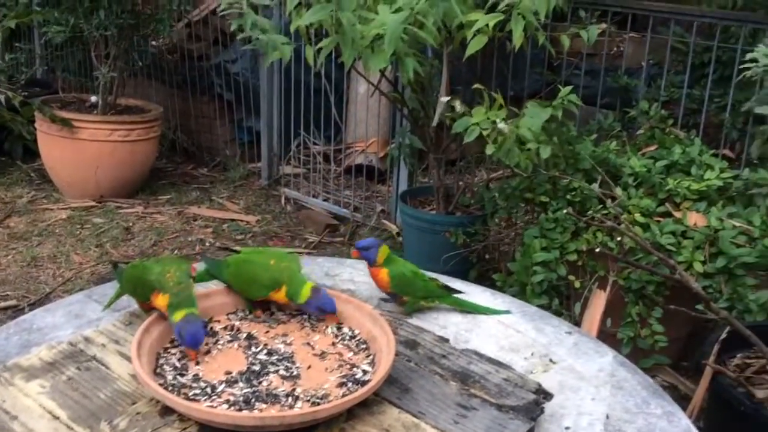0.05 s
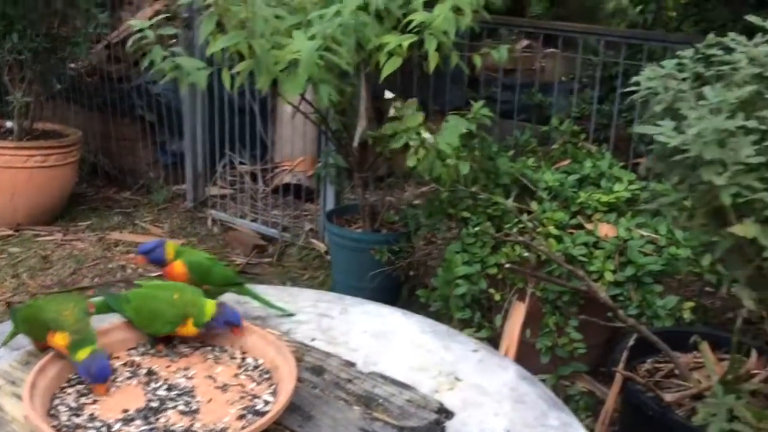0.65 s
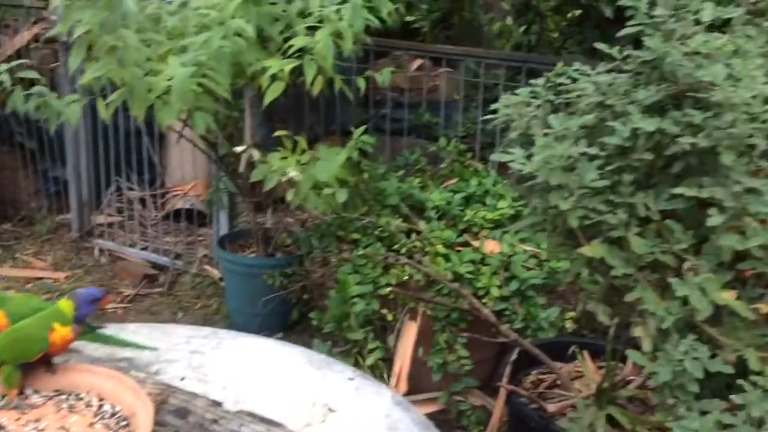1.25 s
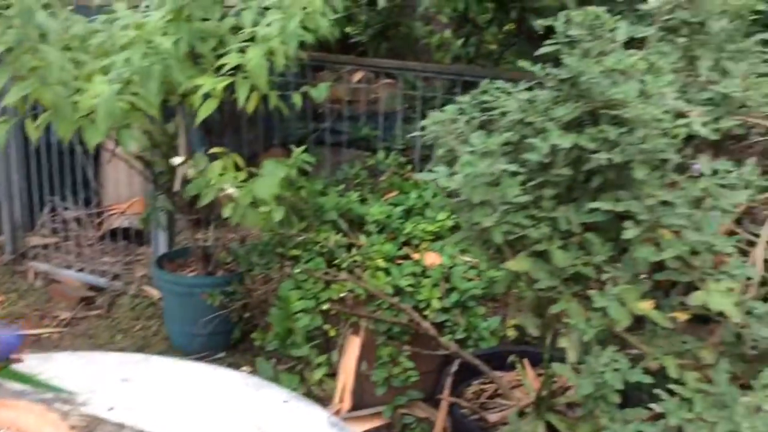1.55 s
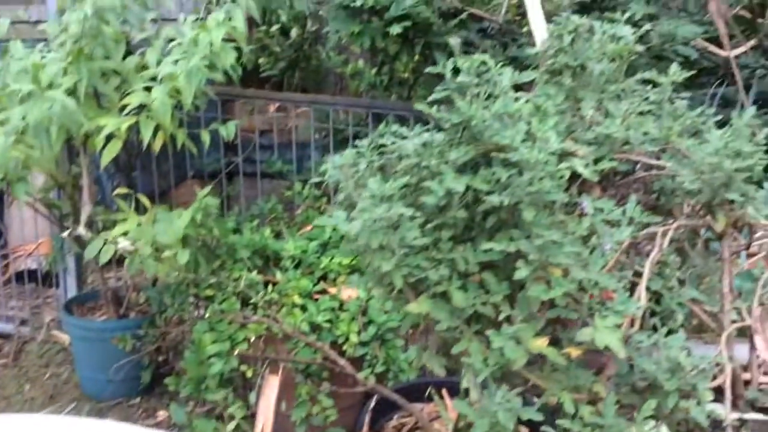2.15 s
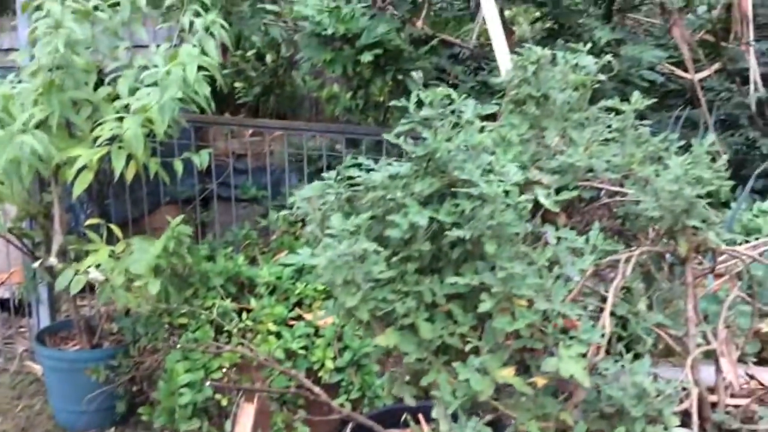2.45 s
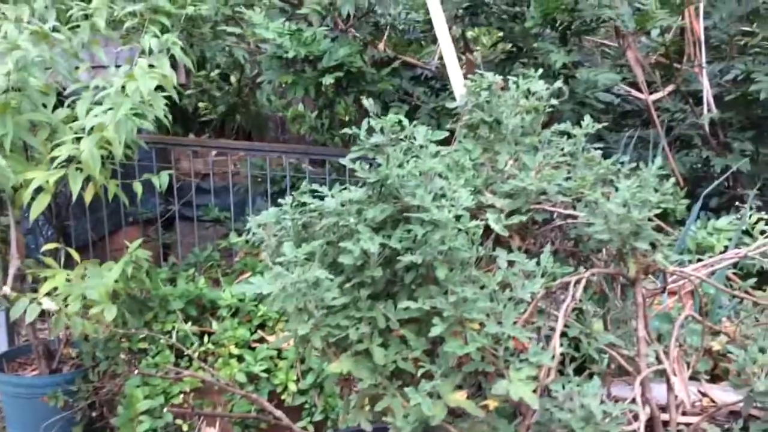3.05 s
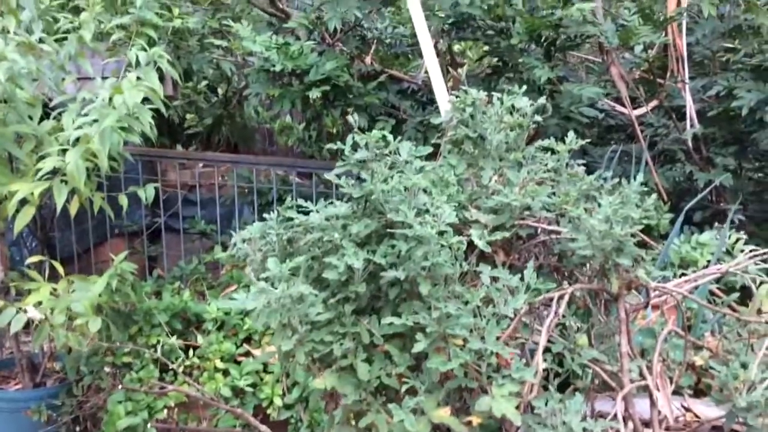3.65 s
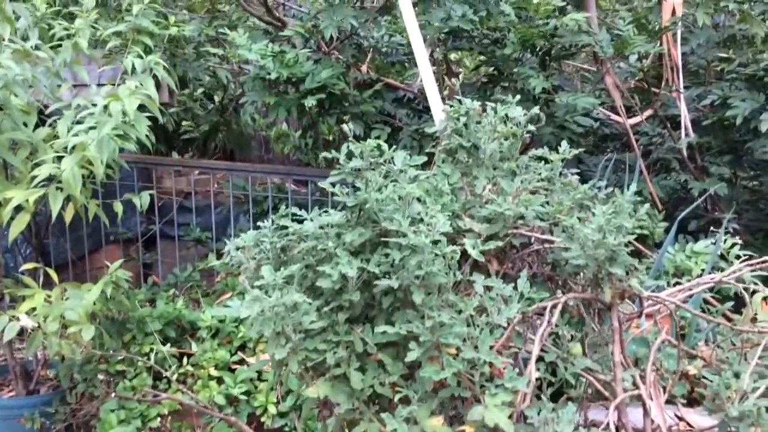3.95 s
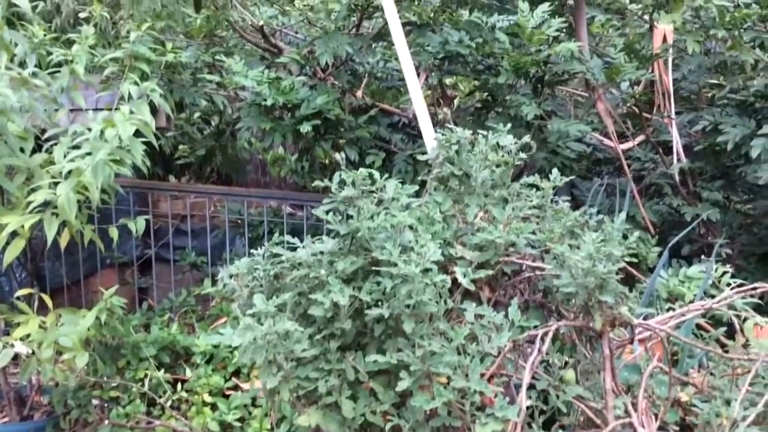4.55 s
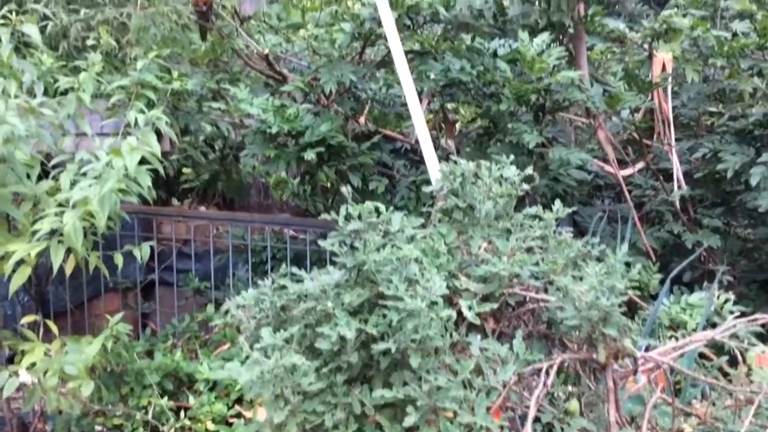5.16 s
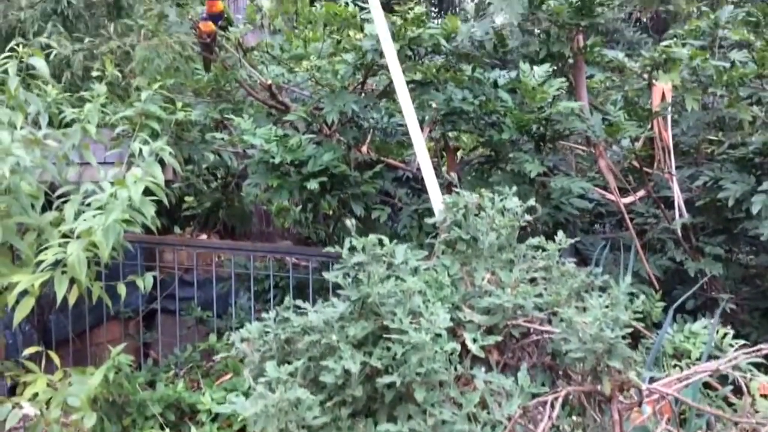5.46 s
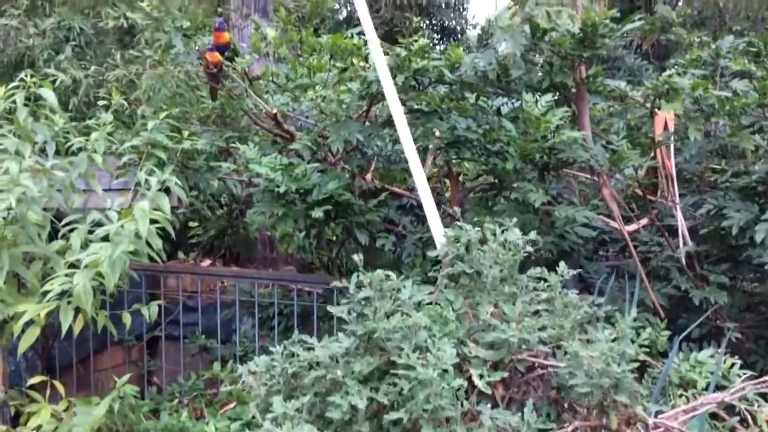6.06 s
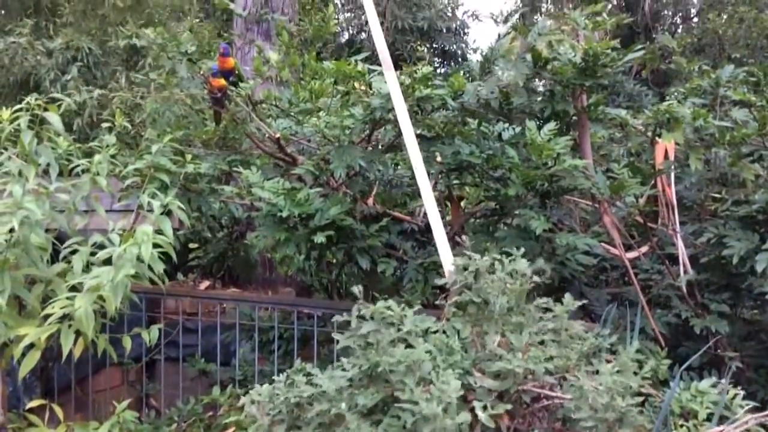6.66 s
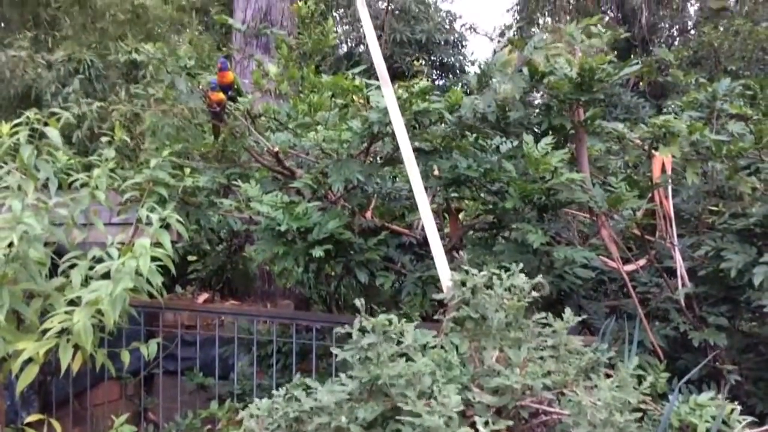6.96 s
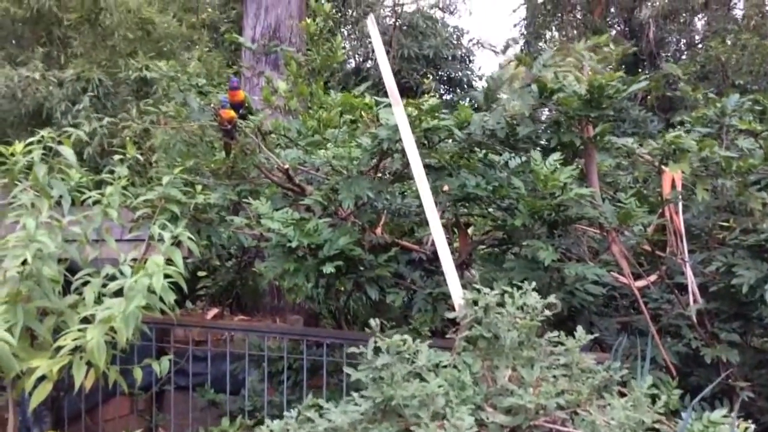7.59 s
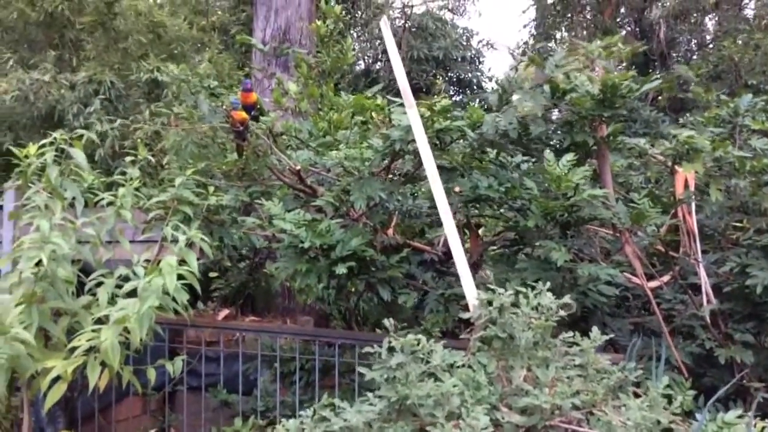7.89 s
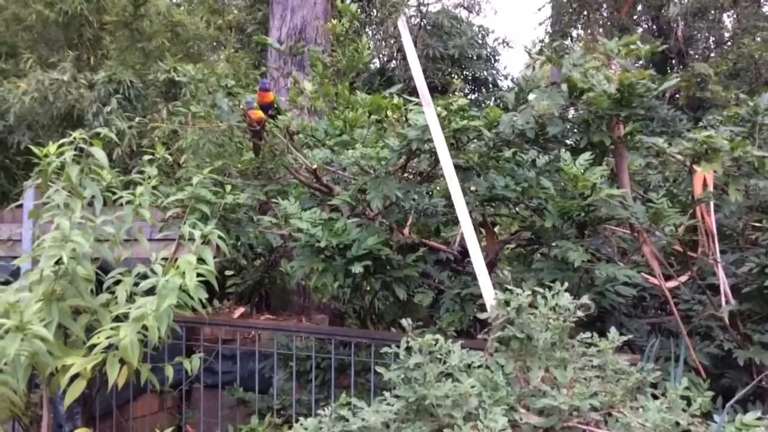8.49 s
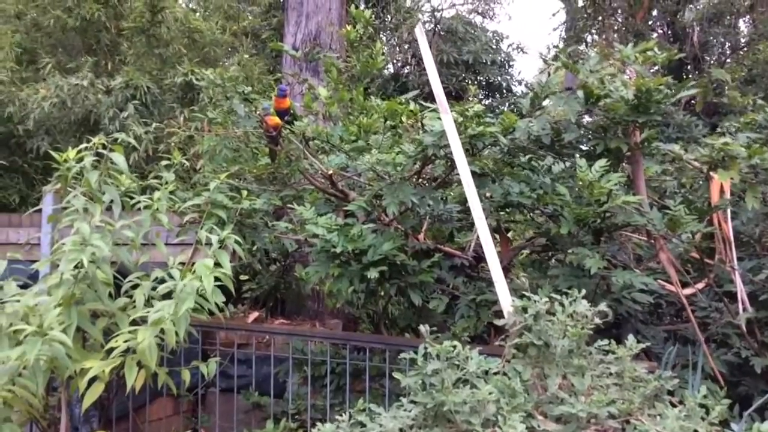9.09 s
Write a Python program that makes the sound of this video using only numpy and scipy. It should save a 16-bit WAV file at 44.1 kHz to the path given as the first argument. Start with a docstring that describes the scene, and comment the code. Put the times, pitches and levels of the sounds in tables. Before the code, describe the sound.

Parrots call around a garden feeder. The flock in the trees trades short, high, gliding chirps in quick clusters, now and then breaking into brief rasping screeches, while one close bird twitters in lower, scratchy syllables. Early on, a few seed husks click and the hand-held microphone takes soft dull bumps. The calls echo lightly off fence and foliage, over steady leaf hiss and a faint engine drone.

```python
"""Garden feeder with lorikeets. One close bird twitters in quick low syllables; the flock in the trees
trades shrill gliding calls that break into rasping screeches. Each note is a harmonic glide of the
syrinx, shaped by throat and beak; blown hard, the syrinx pulses chaotically. Fence and foliage echo.
Distant engines drone, leaves hiss, seed husks click, the hand-held microphone takes a few dull bumps."""
import sys
import numpy as np
from scipy import signal
from scipy.fft import rfft, irfft, next_fast_len
from scipy.io import wavfile
from scipy.ndimage import map_coordinates

SR = 44100
rng = np.random.default_rng(int(sys.argv[2]) if len(sys.argv) > 2 else 0)


def transcribe(signal):
    """Save signal, clipped to [-1, 1], as a 16-bit WAV file at the path in sys.argv[1]."""
    frames = np.atleast_2d(signal).T
    limited = np.clip(frames, -1, 1)
    pcm = np.round(limited * 32767).astype(np.int16)
    wavfile.write(sys.argv[1], SR, pcm)


N = 411453

AIR_SPECTRUM = [(15, -63), (25, -30), (48, -4.5), (69, -1), (107, -9.5), (198, -10.5), (349, -11.5),
                (378, -15), (410, -12), (722, -12.5), (2060, -19.5), (2230, -22.5), (2420, -19),
                (9050, -21.5), (15500, -40)]  # air and leaves: f/Hz, relative density/dB
ENGINE_DRONE = [(0, 78.1, -67), (.8, 80, -71), (1.8, 85, -67), (2.9, 86.7, -86), (3.5, 88, -63),
                (4.4, 86, -65), (5, 84, -61.5), (5.8, 82, -58), (6.3, 82, -66.5), (6.7, 81.7, -61),
                (7.1, 78, -97), (8.6, 67, -68), (9.33, 64.7, -75)]  # distant engine: t/s, firing f/Hz, level/dB
ENGINE_REV = [(7.3, 128, -100), (7.5, 131.7, -70), (7.7, 140, -65.5), (7.88, 145, -65), (8.05, 144, -100)]  # second engine, brief rev: t/s, firing f/Hz, level/dB
MIC_BUMPS = [(.85, -46, 75), (.93, -50, 80), (1.19, -53, 55), (2.14, -46, 62), (2.176, -50, 80),
             (2.268, -51, 64.4), (2.436, -46, 60.4), (2.454, -45, 140), (2.567, -42.5, 67.4)]  # dull knocks: t/s, level/dB, f/Hz
HUSK_CRACKS = [(0.907, -43), (1.76, -34), (2.392, -39), (2.73, -34), (2.757, -33.5)]  # seeds opened: t/s, excitation level/dB
FOLIAGE_DECAY = [(500, 0.62), (3000, 0.73), (6000, 0.71), (10000, 0.79), (15000, 0.41)]  # echo tail: f/Hz, T60/s
FOLIAGE_COLOUR = [(800, 4.5), (1800, -5), (3000, 0.5), (6000, 2), (10000, -1)]  # echo tail: f/Hz, gain/dB
BEAK_GAIN = [(500, -50), (1000, -8), (1500, -11.5), (2200, -2.5), (3000, -3.5), (3600, 3), (4300, -2),
             (5100, 1.5), (6400, -3.5), (7900, -2.5), (9500, -4), (11000, -11.5), (13000, -45),
             (15500, -53)]  # wide open beak: f/Hz, gain/dB
THROAT_TREBLE = [(7000, 1.5), (9500, 3), (11000, -4), (13000, -4.5), (15500, -20)]  # top harmonics leaving the throat: f/Hz, gain/dB
FLOCK_FORMANTS = [(1500, -0.5), (2200, 3.5), (2900, -1.5), (3700, 6), (4400, 0), (5200, 2.5), (6000, 1.5),
                  (6700, -4.5), (8000, -10), (9600, -13), (11400, -21), (13000, -34)]  # flock's throat resonances: f/Hz, gain/dB
CLOSE_FORMANTS = [(900, 2), (1900, 1.5), (2850, 0.5), (3700, -8.5), (4600, 3), (5400, -9), (7200, -16.5),
                  (9500, -26.5)]  # close bird's throat resonances: f/Hz, gain/dB
# flock glides: t/s, length/s, start f/Hz, end f/Hz, relative level/dB, brightness/dB
FLOCK_CALLS = [(0, 0.029, 2445, 2750, -58, -5), (.211, 0.014, 2640, 2980, -60, -10),
               (0.35, 0.17, 2745, 3187, -58, 3.5), (.795, 0.0402, 4000, 3590, -55.5, -1),
               (0.838, 0.081, 2537, 3010, -58, 0.5), (1.154, 0.055, 2164, 2280, -54, -6),
               (1.211, 0.034, 2510, 2815, -44, 4.5), (1.251, .05, 2450, 2316, -47.5, 9),
               (1.257, 0.056, 3990, 4100, -44.5, 8), (1.307, 0.022, 3394, 3265, -40, 9),
               (1.555, 0.028, 4030, 3720, -39, 8), (1.58, 0.024, 2680, 2366, -40.5, -5),
               (1.772, 0.032, 3550, 2930, -47, -4), (1.805, 0.075, 3820, 3430, -51, 3),
               (1.836, 0.095, 2564, 2530, -49, 4), (1.938, 0.072, 3050, 2624, -45.5, -2),
               (1.945, 0.032, 2440, 2250, -44, -2), (2.031, 0.038, 3120, 3120, -48.5, 4),
               (2.076, 0.041, 2760, 2474, -47, -4), (2.117, 0.067, 3645, 3780, -49, 1),
               (2.171, 0.057, 3286, 2815, -42, -6.5), (2.519, 0.054, 2120, 2640, -55, 14),
               (2.582, 0.047, 4180, 3930, -52.5, 3), (2.631, 0.091, 2810, 3150, -49.5, 5),
               (2.917, 0.091, 3165, 3270, -61, -3), (3.068, 0.069, 2210, 2800, -55, -3),
               (3.149, 0.098, 2272, 2566, -51.5, -0.5), (3.327, .14, 2467, 2836, -57, 0.5),
               (3.396, 0.17, 3625, 4116, -57, -2), (3.709, 0.13, 2250, 2440, -56.5, 3.5),
               (3.798, 0.085, 2550, 2580, -49.5, 9), (3.931, .056, 2745, 2890, -55, -4.5),
               (4.01, 0.093, 3043, 2910, -51, -1), (4.084, 0.089, 3800, 4390, -47, 4.5),
               (4.138, 0.093, 3120, 3337, -45, 10.5), (4.245, .037, 3050, 2570, -53, -8),
               (4.323, 0.063, 3505, 3203, -47.5, 7), (4.328, 0.056, 2040, 2800, -49.5, 3.5),
               (4.481, 0.071, 2880, 2910, -54.5, -3), (4.575, 0.056, 2790, 4040, -54.5, 6),
               (4.741, 0.068, 1477, 1690, -52.5, -3), (4.788, 0.032, 4140, 3860, -53.5, 0),
               (4.859, 0.065, 1730, 2180, -51, 0), (4.977, .07, 3060, 2970, -50, 1),
               (5.25, 0.13, 2150, 2393, -56, 4.5), (5.338, .18, 2480, 2557, -53.5, 4),
               (5.359, .13, 2836, 3170, -52.5, 3.5), (5.68, 0.076, 2080, 2880, -54.5, -3),
               (5.752, .022, 2786, 3050, -37.5, -8.5), (5.768, 0.041, 3720, 3770, -34, 1),
               (5.798, 0.0279, 3540, 3916, -34.5, 0.5), (5.843, .036, 2660, 2630, -46, -12),
               (5.907, .059, 3625, 3440, -49, 1), (5.921, .11, 2798, 2650, -49.5, -3),
               (6.01, 0.081, 2865, 3060, -53.5, 0), (6.017, 0.052, 3990, 3930, -53, -6),
               (6.23, 0.094, 2277, 2520, -54.5, 1.5), (6.29, .029, 3990, 3880, -50.5, -3),
               (6.319, 0.047, 2880, 3110, -48.5, 3.5), (6.358, 0.036, 2230, 2185, -52, 4),
               (7.56, 0.057, 3210, 3474, -50, 5), (7.719, 0.17, 1560, 1748, -60, -4),
               (7.75, 0.13, 3175, 3440, -59.5, 4), (7.828, 0.12, 4190, 4800, -50, 0),
               (7.907, .062, 3765, 3200, -48.5, 9.5), (8.031, 0.068, 2766, 2790, -41.5, -8.5),
               (8.097, 0.13, 2853, 3122, -36.5, 9), (8.102, 0.071, 2577, 2627, -40, 6.5),
               (8.2, 0.058, 3120, 3227, -40.5, 5), (8.27, .12, 3950, 3354, -45.5, -5),
               (9.086, 0.16, 2033, 2870, -58.5, -8), (9.195, 0.15, 3585, 3860, -54, -9)]
# screeches: peak t/s, swell/s, fade/s, level/dB, pulse f/Hz, whistle f/Hz, whistle level/dB
SCREECH_BURSTS = [(1.593, 0.0082, .016, -39, 817, 3280, -47), (4.692, 0.032, 0.028, -34, 705, 1427, -43),
                  (4.952, 0.025, 0.034, -41.5, 726, 1423, -49),
                  (6.494, .031, 0.0157, -26.5, 900, 2480, -35),
                  (6.532, 0.0076, 0.015, -33.5, 1947, 1918, -41),
                  (6.963, 0.023, 0.019, -34, 1142, 3510, -51.5), (7.5, .019, 0.0157, -61, 957, 1753, -54),
                  (7.621, .024, 0.021, -35.5, 1161, 3450, -52), (8.33, 0.054, 0.082, -41.5, 920, 3590, -47)]
# close bird's runs: t/s, length/s, syllables, start f/Hz, end f/Hz, rasp/0-1, level/dB, brightness/dB
CLOSE_RUNS = [(0, 0.018, 1, 1603, 1476, 0.67, -49.5, -3.5), (1.447, 0.041, 1, 1790, 1970, 0.14, -48.5, -13),
              (1.496, 0.067, 1, 2260, 2580, 0.15, -43, -13), (1.908, 0.012, 1, 840, 940, 0.08, -43.5, 7),
              (1.914, 0.025, 1, 1905, 2200, 0.12, -29.5, 7.5), (1.964, 0.026, 1, 1727, 1950, .1, -44.5, -1),
              (2.0, .03, 2, 1890, 1824, 0.21, -39, 4.5), (2.047, .021, 1, 1690, 1650, .1, -49, 2),
              (2.759, 0.019, 1, 890, 840, .33, -59, -21), (4.587, 0.04, 1, 2100, 1740, 0.27, -47, 4),
              (4.621, 0.057, 1, 1233, 1400, 0.13, -42, 4.5), (6.411, .05, 1, 1852, 2257, 0.34, -39, 4.5),
              (6.567, 0.03, 1, 1744, 1980, .2, -42.5, -6), (6.597, .008, 1, 1800, 1480, .1, -44, -3),
              (6.612, .025, 1, 1754, 2055, 0.21, -35.5, 4.5), (6.642, 0.077, 4, 1740, 1787, 0.2, -42, -2.5),
              (7.369, 0.053, 1, 1940, 1544, .35, -55.5, -4), (7.418, 0.061, 1, 1866, 1686, 0.3, -51.5, -4),
              (7.473, 0.055, 1, 880, 970, 0.49, -46.5, -3.5), (8.281, .049, 1, 850, 938, 0.67, -50.5, 2),
              (8.836, 0.015, 1, 1815, 2000, 0.17, -45.5, -7.5),
              (8.867, 0.032, 1, 1040, 936, 0.3, -50, -1.5), (8.916, 0.037, 2, 1960, 1700, 0.25, -49, 0.5),
              (8.956, 0.073, 4, 1684, 1690, 0.24, -50.5, 6), (9.035, .045, 1, 986, 960, 0.26, -44, 1),
              (9.121, 0.032, 2, 1670, 1744, 0.32, -49, 3), (9.156, .075, 2, 1890, 1714, 0.27, -55, -2),
              (9.26, 0.063, 2, 1506, 1634, 0.3, -55, -5)]
# its clean two-note seesaw: first t/s, note length/s, f/Hz, level/dB, brightness/dB
CLOSE_SEESAW = [(6.719, 0.0227, 1700, -49.5, 4), (6.755, 0.016, 2010, -50.5, 0)]

TOP_HZ = 15400
CALL_EDGE_S = .006  # half of a call's fade-in or fade-out


def amp(db):
    """Decibels to gain."""
    return 10 ** (np.asarray(db) / 20)


def unit(x):
    """Scale to rms 1."""
    return x / np.sqrt(np.mean(x ** 2) + 1e-20)


def along(points, hz):
    """Interpolate (f/Hz, value) points on a log axis."""
    f, v = np.transpose(points)
    return np.interp(np.log(hz + 1), np.log(f), v)


def wobble(rate_hz, size):
    """Smooth random curve, knots at rate_hz."""
    knots = rng.standard_normal(int(size * rate_hz / SR) + 4)
    return map_coordinates(knots, [np.arange(size) * rate_hz / SR])


def filtered(x, response):
    """Apply a frequency response."""
    m = next_fast_len(len(x) + 8192)
    return irfft(rfft(x, m) * response(np.fft.rfftfreq(m, 1 / SR)), m)[:len(x)]


def noise(spectrum):
    """Coloured noise, rms 1."""
    return unit(filtered(rng.standard_normal(N), lambda hz: amp(along(spectrum, hz))))


def add(track, t_s, sound):
    """Mix a sound in at t_s."""
    i = int(np.clip(round(t_s * SR), 0, N))
    track[i:i + len(sound)] += sound[:N - i]


def air(level_db):
    """Steady outdoor rumble and leaf hiss."""
    return amp(level_db + .3 * wobble(4, N)) * noise(AIR_SPECTRUM)


def engine(rows, waver_db):
    """From afar only the firing tone carries."""
    t_s, *columns = np.transpose(rows)
    hz, db = [np.interp(np.arange(N) / SR, t_s, column) for column in columns]
    return np.sqrt(2) * amp(db + waver_db * wobble(7, N)) * np.sin(2 * np.pi * np.cumsum(hz) / SR)


def bumps(rise_cycles):
    """Soft pushes on the microphone, gone within a few cycles."""
    out, t = np.zeros(N), np.arange(SR // 4) / SR
    for t_s, db, hz in MIC_BUMPS:
        age = hz * t / rise_cycles
        add(out, t_s, amp(db) * age * np.exp(1 - age) * np.sin(2 * np.pi * hz * t))
    return out


def husks(shell_hz, t60_s):
    """Husks snap: tiny noise bursts through a broad shell resonance."""
    out, t = np.zeros(N), np.arange(SR // 20) / SR
    for t_s, db in HUSK_CRACKS:
        add(out, t_s, amp(db - 60 * t / t60_s) * rng.standard_normal(len(t)))
    return filtered(out, lambda hz: 1 / (1 + 1j * (hz / shell_hz - shell_hz / (hz + 1))))


def garden_echo(x, build_s, slap_db, slaps=8):
    """Slaps off ground and fence, then foliage scatter."""
    hz, t, spectra = signal.stft(rng.standard_normal(SR), SR, nperseg=256)
    decay_db = along(FOLIAGE_COLOUR, hz)[:, None] - 60 * t / along(FOLIAGE_DECAY, hz)[:, None]
    envelope = amp(decay_db) * (1 - np.exp(-t / build_s))
    tail = signal.istft(spectra * envelope, SR, nperseg=256)[1]
    tail /= np.linalg.norm(tail) * np.sqrt(2)
    delays_s = rng.uniform(.003, .04, slaps)
    tail[(delays_s * SR).astype(int)] += amp(slap_db) * rng.choice([-1, 1], slaps)
    return signal.fftconvolve(x, tail)[:N]


def beak(hz):
    """Minimum-phase response of the open beak: resonances ring on after each pulse."""
    cepstrum = irfft(np.log(amp(along(BEAK_GAIN, hz))))
    cepstrum[1:len(cepstrum) // 2] *= 2
    cepstrum[len(cepstrum) // 2:] = 0
    return np.exp(rfft(cepstrum))


def throat(hz):
    """Output gain of the throat; rolls off the top harmonics."""
    return amp(along(THROAT_TREBLE, hz))


def overtones(formants, hz, bright_db, last=3):
    """Harmonics 2..last in dB re the first: throat resonances plus brightness."""
    return along(formants, np.arange(2, last + 1) * hz) - along(formants, hz) + bright_db


def arched(start_hz, end_hz, arch):
    """Start, middle and end pitch of a glide bowed upward by the fraction arch."""
    line_hz = np.array([start_hz, (start_hz + end_hz) / 2, end_hz])
    return line_hz * (1 + arch * np.array([-2, 1, -2]) / 3)


def syllable(length_s, pitches_hz, rasp, overtones_db, edge_s, jitter, quaver, flutter_db, fall_db,
             crest=0.46, arch_db=5):
    """One syrinx glide; rasp scales the shake of pitch and pressure, smearing the harmonics."""
    t = np.arange(int((length_s + 2 * edge_s) * SR)) / SR - edge_s
    progress = np.clip(t / length_s, 0, 1)
    glide_hz = np.polyval(np.polyfit([0, .5, 1], pitches_hz, 2), progress)
    shake = jitter * wobble(1300, len(t)) + quaver * wobble(169.64, len(t))
    phase = 2 * np.pi * np.cumsum(glide_hz * (1 + rasp * shake)) / SR
    levels_db = np.concatenate([[0], overtones_db, overtones_db[-1] - fall_db * np.arange(1, 9)])
    tone = sum(amp(db) * np.sin(k * phase)
               for k, db in enumerate(levels_db, 1) if k * pitches_hz[1] < TOP_HZ)
    ramp = np.clip(np.minimum(t + edge_s, length_s + edge_s - t) / (2 * edge_s), 0, 1)
    gate = np.sin(np.pi / 2 * ramp) ** 2
    tremor = 1.18 * wobble(422.8, len(t)) + 0.65 * wobble(85.5, len(t))
    pressure_db = flutter_db * np.sqrt(rasp) * tremor - arch_db * (2 * (progress - crest)) ** 2
    return unit(tone) * gate * unit(amp(pressure_db))


def distant_babble(level_db, centre_hz, log_spread, until_s, count=90):
    """Faint arched calls from deep in the trees."""
    out = np.zeros(N)
    for k, (slot, detune, stretch, push) in enumerate(rng.uniform(-1, 1, (count, 4))):
        hz = centre_hz * np.exp(log_spread * detune)
        note = syllable(0.0426 + 0.0232 * stretch, (.93 * hz, hz, .92 * hz), rasp=0.292,
                        overtones_db=[-1, -12], edge_s=0.0044,
                        jitter=0.1, quaver=0.075, flutter_db=2.5, fall_db=16)
        add(out, until_s * (k + 1 + slot) / count, amp(level_db + 1.2 * push) * note)
    return out


def flock(direct_db, fence_db, fence_s, scratch_db, typical_db=-50, typical_s=.06):
    """Shrill calls as (direct, echo send). Fainter = farther: more echo and rasp. Longer = rougher."""
    direct, send = np.zeros(N), np.zeros(N)
    for t_s, length_s, start_hz, end_hz, db, bright_db in FLOCK_CALLS:
        far_db = typical_db - db
        echo_db = -2 + 0.39 * far_db
        rasp = .21 * np.sqrt(length_s / typical_s) * amp(.5 * far_db)
        pitches_hz = arched(start_hz, end_hz, arch=.012)
        overtones_db = overtones(FLOCK_FORMANTS, pitches_hz[1], bright_db)
        note = syllable(length_s, pitches_hz, rasp, overtones_db, CALL_EDGE_S,
                        jitter=0.1087, quaver=0.08, flutter_db=4.5, fall_db=6.5, crest=0.75, arch_db=1)
        scatter_loss = np.hypot(1, amp(echo_db))
        add(direct, t_s - CALL_EDGE_S, amp(db + direct_db) / scatter_loss * note)
        add(send, t_s - CALL_EDGE_S, amp(db + echo_db) * note)
        add(direct, t_s + rng.uniform(0.59, 1) * fence_s, amp(db + echo_db + fence_db) * note)
    for path in (direct, send):
        puffs = np.maximum(path, 0) * rng.standard_normal(N)  # air escapes once a cycle
        path += amp(scratch_db) * filtered(puffs, beak)
    return filtered(direct, throat), filtered(send, throat)


def screeches(rattle_db, jitter, breath):
    """Overblown, chaotic syrinx: uneven pulses and air puffs ring the beak."""
    out = np.zeros(N)
    for peak_s, swell_s, fade_s, db, pulse_hz, _, _ in SCREECH_BURSTS:
        t = np.arange(-int(4 * swell_s * SR), int(4 * fade_s * SR)) / SR
        hz = pulse_hz * (1 + jitter * wobble(900, len(t)) + .025 * wobble(90, len(t)))
        phase = 2 * np.pi * np.cumsum(hz) / SR
        pulses = unit(sum(np.cos(k * phase) for k in range(1, int(TOP_HZ / pulse_hz))))
        puffs = unit(rng.standard_normal(len(t)) * (1 + np.cos(phase)))
        voice = filtered((pulses + breath * puffs) * amp(rattle_db * wobble(321, len(t))), beak)
        effort = amp(db) * np.exp(-np.abs(t / np.where(t < 0, swell_s, fade_s)) ** 1.06)
        add(out, peak_s + t[0], effort * unit(voice))
    return out


def whistles(lead_swells, lag_fades, bright_db, rise=.11, rasp=.5):
    """A rough rising whistle runs through each screech."""
    out = np.zeros(N)
    for peak_s, swell_s, fade_s, _, _, hz, db in SCREECH_BURSTS:
        lead_s = lead_swells * swell_s
        pitches_hz = hz * (1 + rise * np.array([-.5, 0, .5]))
        overtones_db = overtones(FLOCK_FORMANTS, hz, bright_db)
        note = syllable(lead_s + lag_fades * fade_s, pitches_hz, rasp, overtones_db, CALL_EDGE_S,
                        jitter=0.1125, quaver=0.082, flutter_db=4.5, fall_db=2)
        add(out, peak_s - lead_s - CALL_EDGE_S, amp(db) * note)
    return filtered(out, throat)


def twitter_notes(quick_s=0.0182, pitch_spread=0.0204, spread_db=1.5, pairs=3, pair_s=.055, fade_db=2):
    """Close bird's notes: runs of quick arches, no two alike, and fading pairs of flat notes."""
    for t_s, length_s, count, start_hz, end_hz, rasp, db, bright_db in CLOSE_RUNS:
        pace_s = length_s / count
        hz = np.linspace(start_hz, end_hz, count + 1)
        arch = 0.19 * min(1, quick_s / pace_s) ** 2  # longer notes are flatter
        for k, (push, detune) in enumerate(rng.standard_normal((count, 2)) * (count > 1)):
            pitches_hz = arched(hz[k], hz[k + 1], arch) * (1 + pitch_spread * detune)
            yield t_s + k * pace_s, pace_s, pitches_hz, rasp, db + spread_db * push, bright_db
    for t_s, length_s, hz, db, bright_db in CLOSE_SEESAW:
        for k in range(pairs):
            yield t_s + k * pair_s, length_s, (hz, hz, hz), .03, db - k * fade_db, bright_db


def close_bird(scratch_db, edge_s=.0015):
    """Crisp syllables run together; one air puff a cycle makes them scratchy."""
    out = np.zeros(N)
    for t_s, length_s, pitches_hz, rasp, db, bright_db in twitter_notes():
        overtones_db = overtones(CLOSE_FORMANTS, pitches_hz[1], bright_db, last=4)
        note = syllable(length_s, pitches_hz, rasp, overtones_db, edge_s,
                        jitter=0.17, quaver=0.136, flutter_db=3.5, fall_db=6, crest=0.41, arch_db=3.5)
        add(out, t_s - edge_s, amp(db) * note)
    scratch = amp(scratch_db) * np.maximum(out, 0) * noise(BEAK_GAIN)
    return filtered(out + scratch, throat)


def scene():
    """Mono mix: birds share one echo over the background; the babble is echo only."""
    close = close_bird(scratch_db=-18)
    screech = screeches(rattle_db=0, jitter=0.0608, breath=1.0)
    whistle = whistles(lead_swells=1.6, lag_fades=0.69, bright_db=0.5)
    calls, calls_send = flock(direct_db=2, fence_db=-13, fence_s=0.033, scratch_db=-9.5)
    babble = distant_babble(level_db=-60, centre_hz=2878, log_spread=.4, until_s=6.4)
    send = calls_send + babble + amp(-13.5) * close + amp(-11) * screech + amp(-5.5) * whistle
    echo = garden_echo(send, build_s=0.013, slap_db=-12.5)
    background = air(level_db=-58) + engine(ENGINE_DRONE, waver_db=3) + engine(ENGINE_REV, waver_db=0.5)
    transients = husks(shell_hz=7000, t60_s=0.012) + bumps(rise_cycles=0.45)
    return (background + transients + echo + calls + screech + whistle + close)[None]


def record(dry):
    """Brick-wall low-pass at TOP_HZ."""
    return np.array([filtered(x, lambda hz: hz < TOP_HZ) for x in dry])


dry = scene()
out = record(dry)
transcribe(out)
```